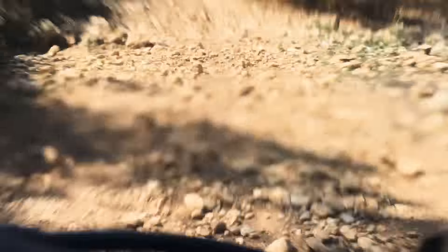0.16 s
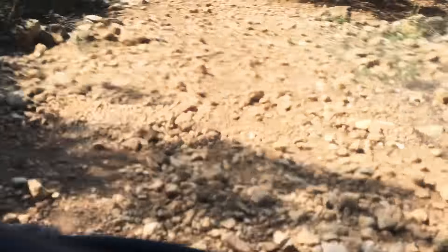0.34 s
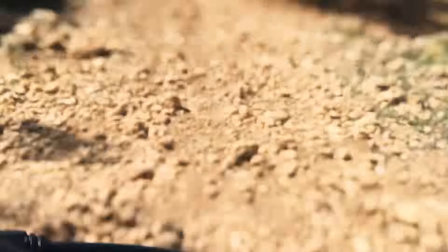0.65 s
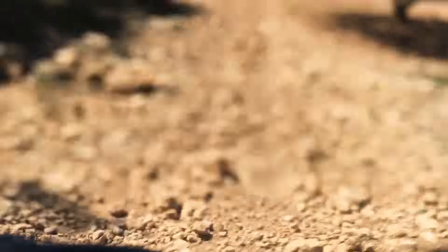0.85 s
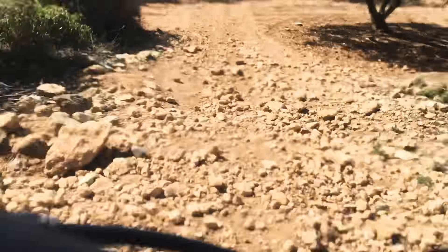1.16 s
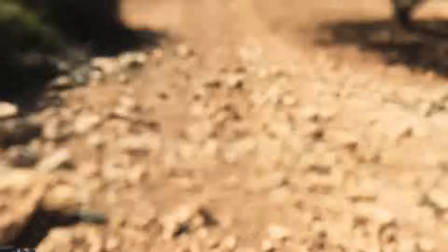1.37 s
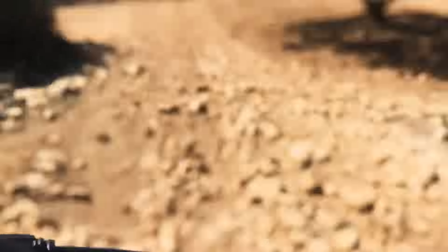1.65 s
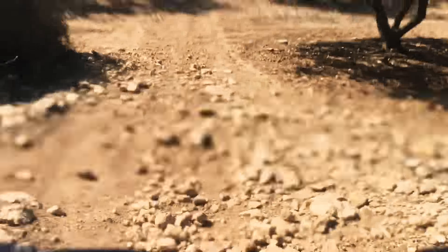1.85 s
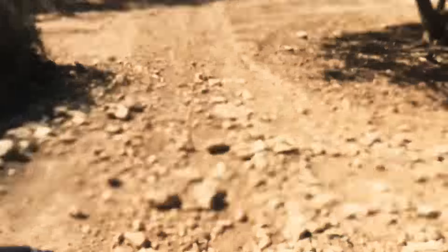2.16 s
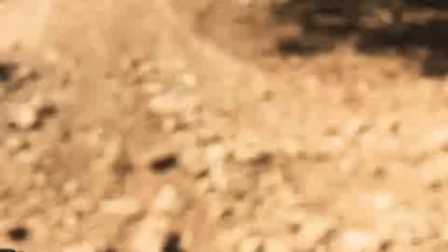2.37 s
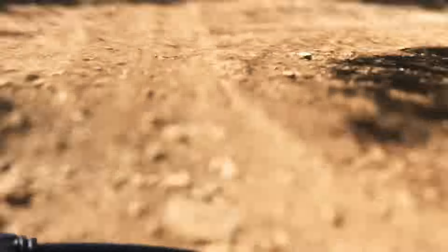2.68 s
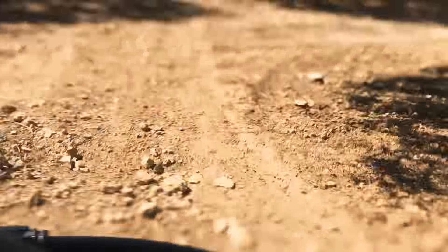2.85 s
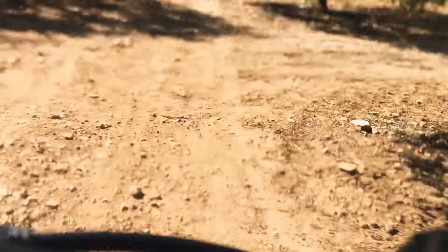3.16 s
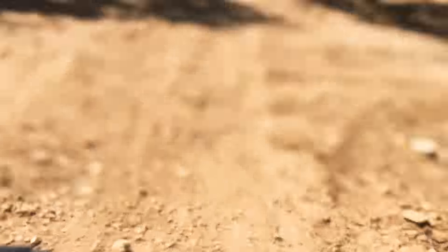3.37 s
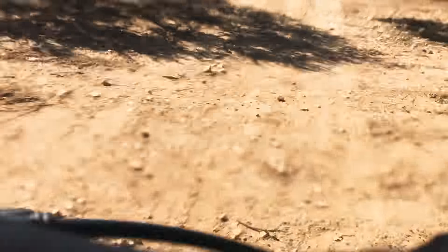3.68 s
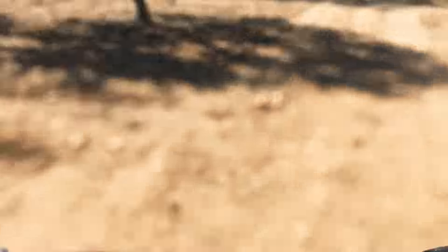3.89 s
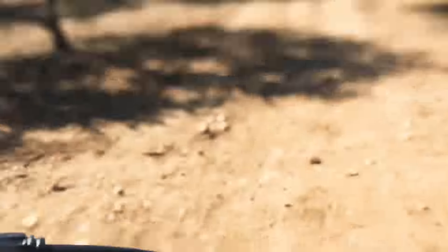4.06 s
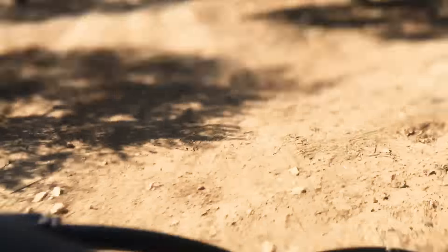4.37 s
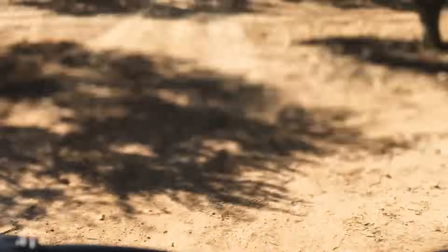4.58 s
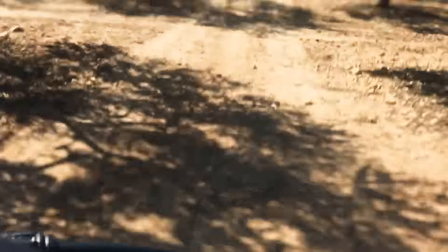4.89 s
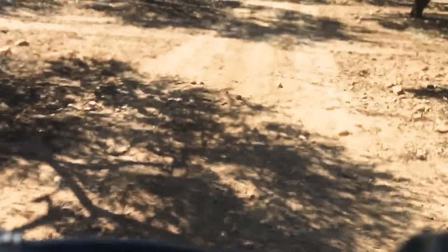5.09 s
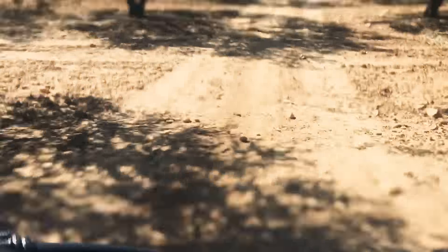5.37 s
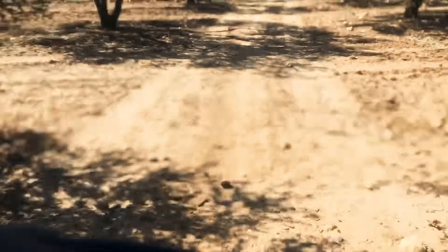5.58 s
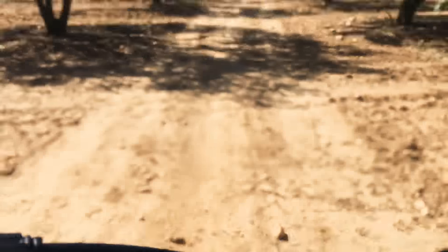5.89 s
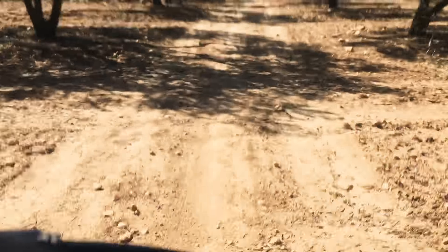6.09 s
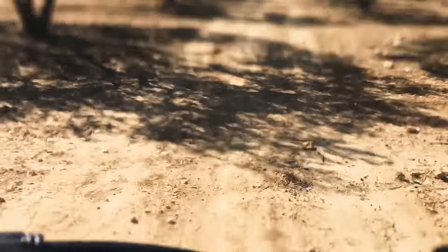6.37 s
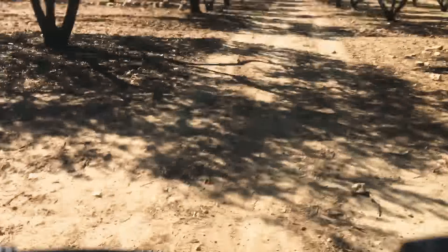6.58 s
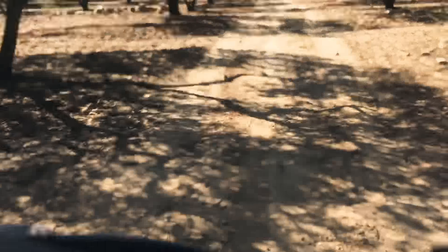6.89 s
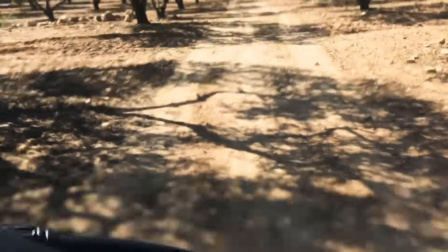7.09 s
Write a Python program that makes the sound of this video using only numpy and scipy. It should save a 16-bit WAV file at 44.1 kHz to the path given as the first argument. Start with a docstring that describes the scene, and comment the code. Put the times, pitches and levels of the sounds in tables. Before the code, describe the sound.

A mountain bike freewheels down a stony track, tyres crunching gravel, stones knocking rim and frame, hub ticking, wind rumbling, then easing onto packed dirt.

```python
"""On a stony track that smooths out into packed dirt, a mountain bike freewheels downhill.
The tyres crush gravel and flick grit: many tiny ringing pebbles over noise, plus short loud snaps.
Stones knock on rim and frame and the freehub ratchet ticks: short blows that set metal ringing.
Filtered noise hisses as passing air; wind and jolts make a lumpy rumble in one housed microphone."""
import sys
import numpy as np
from scipy import signal
from scipy.fft import rfft, irfft, next_fast_len
from scipy.io import wavfile

SR = 44100
rng = np.random.default_rng(int(sys.argv[2]) if len(sys.argv) > 2 else 0)


def master(y):
    """Save y as 16-bit WAV."""
    cut = np.clip(np.atleast_2d(y).T, -1, 1)
    pcm = np.round(cut * 32767)  # scale
    wavfile.write(sys.argv[1], SR, pcm.astype(np.int16))


N = 319284

# buffets and jolts pushing at the microphone: (t/s, peak level/dB, f/Hz)
BUFFET_EVENTS = [(0.068, -12, 92.5), (0.123, -14, 48), (0.16, -10.5, 91), (0.224, -26, 95),
                 (0.335, -19, 64), (0.464, -16.5, 95), (0.731, -21.5, 64), (0.868, -24, 65),
                 (0.958, -14.5, 98), (1.02, -14, 89), (1.151, -11, 159), (1.437, -14, 75),
                 (1.694, -16, 108), (1.815, -20, 76), (2.028, -32, 77), (2.059, -13.5, 65.4),
                 (2.157, -21, 69), (2.226, -13.5, 71), (2.403, -16.5, 71.5), (2.691, -25, 70),
                 (2.732, -18.5, 81.5), (2.768, -17, 81), (2.866, -15.5, 63.5), (2.896, -21, 53),
                 (3.064, -12, 57.6), (3.156, -23, 88.5), (3.353, -17.5, 70.6), (3.474, -20.5, 75),
                 (4.09, -20, 74.6), (4.349, -27.5, 71), (4.556, -23.5, 74.5), (4.845, -13.5, 58.5),
                 (4.985, -17.5, 65), (5.367, -20, 59), (5.574, -21, 80), (5.847, -18, 65.5),
                 (5.967, -26, 77.4), (6.214, -19, 81.5), (6.256, -18.5, 69.6), (6.335, -15.5, 70.4),
                 (6.462, -17.5, 89), (6.604, -20, 64.5), (6.656, -21, 59), (6.722, -12.5, 215),
                 (7.151, -19.5, 96)]


def from_db(db):
    """Turns decibels into a gain."""
    return 10 ** (np.asarray(db) / 20)


def rms_one(x):
    """Scales a sound to an average (rms) strength of 1."""
    return x / np.sqrt(np.mean(x ** 2) + 1e-20)


def with_power(level_db, extra):
    """Adds more power to a level in dB."""
    return 10 * np.log10(from_db(2 * level_db) + extra)


def in_time(rows):
    """Draws straight lines between the rows of a table, giving each column a value per sample."""
    s, *columns = np.transpose(rows)
    return [np.interp(np.arange(N) / SR, s, column) for column in columns]


def drift(rate_hz):
    """Wanders slowly at random with rms 1: noise smoothed twice by a low-pass."""
    step = 16  # samples between the points worked out
    r = np.exp(-2 * np.pi * rate_hz * step / SR)
    noise = rng.standard_normal(N // step + 4002)
    slow = signal.lfilter([1], [1, -2 * r, r * r], noise)[4000:]  # skips the filter's start
    # The points span the whole sound; straight lines fill the samples between them.
    return np.interp(np.arange(N) / step, np.arange(len(slow)), rms_one(slow))


def ring(clicks, hz, t60):
    """Lets each click start a sine that fades by 60 dB in t60 seconds."""
    r = from_db(-60 / (t60 * SR))
    w = 2 * np.pi * hz / SR
    return signal.lfilter([0, np.sin(w)], [1, -2 * r * np.cos(w), r * r], clicks + 1e-18)


def colour(x, spectrum):
    """Filters to a given tone colour with minimum phase, so that nothing sounds early."""
    size = next_fast_len(N + SR // 4)
    hz, level_db = np.transpose(spectrum)
    bins_hz = np.arange(size // 2 + 1) * SR / size
    log_gain = np.interp(np.log(bins_hz + 1), np.log(hz), level_db) * np.log(10) / 20
    # Folding the cepstrum onto its first half makes the filter minimum phase.
    cepstrum = irfft(log_gain, size)
    cepstrum[1:size // 2] *= 2
    cepstrum[size // 2:] = 0
    return irfft(rfft(x, size) * np.exp(rfft(cepstrum)), size)[:N]


def grains(per_s, spread_db, crowding):
    """Scatters random clicks of very uneven size, denser where the crowding is high."""
    size_db = spread_db * np.minimum(rng.exponential(1, N), 4)
    sizes = from_db(size_db) * rng.choice([-1, 1], N)
    return sizes * (rng.random(N) < per_s * crowding / SR)


def pebbles(clicks, low_hz, high_hz, cycles):
    """Deals clicks to stones of 16 sizes; each rings a few cycles, the smaller, higher ones more strongly."""
    pitches = np.geomspace(low_hz, high_hz, 16)
    dealt = rng.integers(0, 16, N)
    return sum(ring(clicks * (dealt == k), hz, cycles / hz) * hz for k, hz in enumerate(pitches))


def scatter(hits, seconds):
    """Makes noise that follows each hit and dies away: chips and sand thrown loose."""
    power = signal.lfilter([1], [1, -np.exp(-1 / (seconds * SR))], hits ** 2)
    return np.sqrt(power) * rng.standard_normal(N)


def add(out, s, burst):
    """Mixes a burst in at a moment."""
    i = max(round(s * SR), 0)
    out[i:i + len(burst)] += burst[:N - i]


def strikes(rows, cycles, rise, rough):
    """Rings each row a few cycles at its pitch, with a second, unrelated tone and a rough edge."""
    out, t = np.zeros(N), np.arange(2400) / SR
    chance = rng.random((len(rows), 3))
    noise = rng.standard_normal((len(rows), len(t)))
    for (s, peak_db, hz), (phase, ratio, length), grain in zip(rows, chance, noise):
        decay = cycles * (0.58 + .5 * length) / hz  # seconds
        shape = (1 - np.exp(-t / (rise * decay))) * np.exp(-t / decay)
        second_hz = hz * 2 ** (1.775 * ratio - .8)
        tone = np.sin(2 * np.pi * (hz * t + phase)) + 0.65 * np.sin(2 * np.pi * second_hz * t)
        burst = shape * (tone + rough * grain)
        add(out, s, from_db(peak_db) * burst / np.abs(burst).max())
    return out


def strays(level_db, above_db, low_hz, high_hz, count):
    """Draws small strikes (t/s, peak/dB, f/Hz) at random, stronger where the ground is louder."""
    when, size, pitch = rng.random((count, 3)).T
    at = (when * (N - 1)).astype(int)
    peak_db = level_db[at] + above_db - 8 * size
    return np.transpose([at / SR, peak_db, low_hz * (high_hz / low_hz) ** pitch])


def air():
    """Makes a soft hiss of air passing rider and spokes: broad noise that gently swells and fades."""
    band = signal.butter(1, [2200, 13900], "band", fs=SR, output="sos")
    hiss = rms_one(signal.sosfilt(band, rng.standard_normal(N)))
    return from_db(-58.5 + 4.5 * drift(3.6)) * hiss


def rumble(level_db, flutter_db):
    """Eddies break on the microphone port as separate pushes; a quicker flutter adds to them."""
    # colour of the rumble: (f/Hz, level/dB)
    rumble_colour = [(13, -29), (22, -15), (54, 0), (86, 0), (144, -9.5), (231, -18.5), (321, -31.5),
                     (385, -34), (500, -48), (650, -92), (1100, -120)]
    eddies = rms_one(grains(150, 3.75, from_db(2.2 * drift(11.0))))
    low = rms_one(colour(eddies + 0.85 * rng.standard_normal(N), rumble_colour))
    slow = signal.sosfiltfilt(signal.butter(2, 130, fs=SR, output="sos"), low)
    quick = low - slow
    return from_db(level_db) * rms_one(low + from_db(flutter_db) * quick)


def wind():
    """Rumbles on the microphone with a changing level, swelling in power round each buffet."""
    # wind through the ride: (t/s, rumble level/dB, gain of added flutter above 130 Hz/dB)
    wind_levels = [(0.0, -33, 4.5), (0.48, -33.5, 0), (0.81, -32.5, -4), (1.15, -24.5, 0.5),
                   (1.71, -29, -3), (2.42, -26, -6), (3.15, -41.5, 4), (3.25, -34, 5), (3.95, -29.5, -18),
                   (4.36, -36.5, 2), (5.46, -33.5, -9.5), (5.89, -27, -25), (6.51, -28.5, -10),
                   (6.81, -33.5, -3), (7.06, -31.5, -12), (7.24, -31, -28)]
    gust_db, gust_s = -11, 0.033  # swell against the buffet's peak, and its half-width
    level_db, flutter_db = in_time(wind_levels)
    t = np.arange(N) / SR
    gusts = sum(from_db(2 * (peak_db + gust_db)) * np.exp(-((t - s) / gust_s) ** 2)
                for s, peak_db, _ in BUFFET_EVENTS)
    return rumble(with_power(level_db, gusts), flutter_db)


def buffets():
    """Each strong eddy or jolt pushes the microphone's diaphragm to and fro a couple of times."""
    out, t = np.zeros(N), np.arange(-2200, 2200) / SR
    for (s, peak_db, hz), phase in zip(BUFFET_EVENTS, rng.random(len(BUFFET_EVENTS))):
        swing = np.exp(-(t * hz / 0.64) ** 2) * np.cos(2 * np.pi * (hz * t + phase))
        add(out, s + t[0], from_db(peak_db) * swing)
    return out


def freehub():
    """At every tooth the pawls drop one after another and chatter, ringing the hub shell."""
    # turning of the ratchet: (t/s, teeth passed so far)
    tooth_count = [(0, 0.0), (4.0, 146.12), (4.2, 153.25), (4.4, 160.55), (4.6, 168.29), (4.8, 175.63),
                   (5.0, 182.49), (5.2, 189.03), (5.4, 196.62), (5.6, 204.26), (5.8, 211.44), (6.0, 219.27),
                   (6.2, 226.62), (6.4, 233.93), (6.6, 241.26), (6.8, 248.39), (7.0, 255.57),
                   (7.24, 264.68)]
    # ringing tones of the hub shell: (f/Hz, level/dB, time to fade by 60 dB/s)
    hub_modes = [(6140, -6.5, 0.022), (7000, -3, 0.0069), (7600, -29, 0.0027), (8170, -6, 0.013),
                 (9300, -23, 0.006), (9300, -3.5, 0.0067), (12000, -13, 0.0044), (12900, -13, 0.012),
                 (13700, -3, .005), (14800, 1, .005), (15400, -7, 0.006)]
    lag_teeth, spread_teeth = -0.085, .1  # shift of every tick; average lateness of its contacts
    s, teeth = np.transpose(tooth_count)
    whole = np.arange(1, teeth[-1])[:, None]
    late = spread_teeth * rng.gamma(2, .5, (len(whole), 24))  # 24 small contacts a tooth
    moments = np.interp(whole + lag_teeth + late, teeth, s)
    at = np.minimum(moments * SR, N - 1).astype(int)
    force = from_db(-52 + 2.0 * rng.standard_normal(whole.shape))
    out = np.zeros(N)
    for hz, level_db, t60 in hub_modes:
        strength = force * from_db(level_db + 1.9 * rng.standard_normal(whole.shape))
        clicks = np.zeros(N)
        clicks[at] = strength * rng.standard_normal(at.shape)
        out += ring(clicks, hz, t60)
    return out


def pings():
    """Parts of the bike ring on after a stone strike, each as one fading sine."""
    # parts that ring: (t/s, peak level/dB, f/Hz, time to fade by 60 dB/s)
    ringing_parts = [(3.366, -25.5, 3450, 0.036), (3.455, -20, 14400, .015), (3.461, -19.5, 13540, 0.029),
                     (3.462, -26, 3480, 0.045), (4.593, -38, 648, 0.39), (4.593, -25.5, 800, 0.084),
                     (5.209, -32, 2360, 0.078)]
    t, out = np.arange(SR // 10) / SR, np.zeros(N)
    for s, peak_db, hz, t60 in ringing_parts:
        add(out, s, from_db(peak_db - 60 * t / t60) * np.sin(2 * np.pi * hz * t))
    return out


def frame(clicks):
    """Blows ring in the tubes and rims, each ringing tone struck with its own strength."""
    # ringing tones of tubes and rims: (f/Hz, level/dB, time to fade by 60 dB/s)
    frame_modes = [(550, -6, 0.013), (800, -4.5, 0.057), (1140, 3.5, 0.052), (1470, -0.5, 0.11),
                   (1857, 9, 0.029), (2150, 11, 0.031), (2386, 3.5, 0.042)]
    out = np.zeros(N)
    for hz, level_db, t60 in frame_modes:
        strength = from_db(level_db + 3 * rng.standard_normal(N))
        out += ring(clicks * strength, hz, t60)
    return out


def knocks(crunch_db):
    """Stones knock briefly; hard, high knocks also splinter and set the frame ringing."""
    # loudest stones on tyre (low), rim and frame: (t/s, peak level/dB, f/Hz)
    loud_knocks = [(.063, -23, 210), (.065, -16.5, 616), (.089, -23, 1100), (.22, -19.5, 215),
                   (.221, -24, 2150), (.325, -20, 675), (.356, -10, 1530), (.419, -11.5, 2220),
                   (.452, -16.5, 201.5), (.452, -16.5, 744), (.459, -16, 940), (.466, -11.5, 2310),
                   (.54, -18.5, 2250), (.549, -22, 1310), (.606, -17.5, 1360), (.616, -20, 1350),
                   (.649, -7.5, 990), (.707, -19, 1590), (.739, -12.5, 1190), (.752, -19, 1160),
                   (.81, -14, 2150), (.856, -14.5, 1070), (.858, -21, 219), (.87, -13.5, 1140),
                   (.934, -21.5, 2040), (.946, -22.5, 227), (.947, -7.5, 860), (1.094, -17, 2450),
                   (1.161, -20.5, 243), (1.204, -15.5, 400), (1.207, -20, 545), (1.242, -14.5, 720),
                   (1.292, -15, 1120), (1.3, -10.5, 1530), (1.309, -4, 1390), (1.317, -22, 1650),
                   (1.529, -18, 1640), (1.692, -21.5, 1090), (1.749, -17, 900), (1.806, -12.5, 800),
                   (1.93, -22, 1860), (2.031, -19, 216), (2.039, -13.5, 2340), (2.156, -22, 875),
                   (2.226, -18, 1470), (2.252, -11.5, 1610), (2.273, -10.5, 1670), (2.284, -10.5, 930),
                   (2.328, -15, 1900), (2.341, -18, 732), (2.408, -14, 606), (2.419, -12.5, 860),
                   (2.535, -18, 2330), (2.544, -13.5, 756), (2.674, -17.5, 1240), (2.693, -21.5, 228),
                   (2.697, -25, 1110), (2.775, -23, 1280), (2.815, -18, 1100), (2.845, -18.5, 1070),
                   (2.902, -17.5, 1140), (3.077, -23.5, 620), (3.131, -17.5, 1970), (3.163, -24, 239),
                   (3.351, -23.5, 890), (3.449, -18, 213), (3.449, -7, 2050), (3.451, -14, 575),
                   (3.459, -21, 1040), (3.479, -11.5, 2260), (3.545, -23, 2220), (3.555, -17, 2200),
                   (3.644, -24.5, 1930), (3.773, -19, 1190), (3.795, -17, 1850), (3.855, -17.5, 1120),
                   (3.949, -18.5, 1550), (3.957, -20, 1190), (3.99, -21.5, 614), (4.069, -16, 2150),
                   (4.077, -13.5, 1110), (4.292, -25.5, 1750), (4.354, -25.5, 2950), (4.423, -21, 1510),
                   (4.561, -23.5, 1560), (4.589, -24.5, 314), (4.591, -16, 850), (4.846, -34, 483),
                   (4.978, -29, 2050), (5.097, -26, 1300), (5.175, -28, 342), (5.287, -24, 1190),
                   (5.325, -18, 1390), (5.332, -12, 2210), (5.412, -26.5, 2240), (5.503, -23.5, 1470),
                   (5.518, -26, 1700), (5.545, -23.5, 1900), (5.572, -25.5, 1180), (5.841, -28, 214),
                   (5.912, -28, 2150), (6.009, -39, 587), (6.315, -28, 330), (6.72, -18.5, 448),
                   (7.119, -36, 2000), (7.135, -22.5, 2050), (7.223, -23.5, 1500)]
    small_knocks = strays(crunch_db, 8.5, 660, 2500, count=40)
    rows = np.vstack([loud_knocks, small_knocks])
    clicks = np.zeros(N)
    for s, peak_db, hz in rows:
        hardness = min(hz / 1000, 1) ** 2  # a soft, low blow barely rings the tubes
        add(clicks, s, from_db([peak_db - 24.5]) * hardness)
    stones = strikes(rows, cycles=1.9, rise=.6, rough=0)
    hard = signal.sosfilt(signal.butter(2, 700, "high", fs=SR, output="sos"), stones)
    chip_band = signal.butter(2, [1300, 4200], "band", fs=SR, output="sos")
    chips = signal.sosfilt(chip_band, scatter(hard, seconds=0.0015))
    return stones + from_db(-19.0) * chips + frame(clicks)


def ground():
    """Sets the track's levels, lifted over loose stone: quick rise, hold, slower fall."""
    # track under the tyres: (t/s, crunch level/dB, big stones' level below 900 Hz/dB, grit level/dB)
    track_levels = [(0.0, -44.5, 5, -35), (0.1, -42.5, -4, -43), (0.54, -39.5, -0.5, -39.5),
                    (1.05, -42, 0, -40.5), (1.29, -42, 3.5, -44.5), (1.57, -43.5, 1.5, -43),
                    (2.1, -40.5, -2.5, -38.5), (2.36, -43, -0.5, -41), (2.88, -42.5, -2, -42.5),
                    (3.27, -45, -1.5, -44), (3.93, -43, -5.5, -42), (4.19, -44.5, -4.5, -47),
                    (4.58, -46.5, -3.5, -56), (4.94, -48.5, -3, -54), (5.44, -48, -5.5, -49),
                    (5.68, -48, -3.5, -49.5), (6.92, -53.5, 0, -64), (7.24, -45.5, -7.5, -48)]
    # patches of loose stone: (start t/s, length/s, crunch level/dB, grit level/dB)
    loose_patches = [(0.061, 0.081, -35.5, -41), (0.284, 0.091, -32, -36.5), (0.418, 0.054, -37, -38),
                     (0.58, .06, -34, -44), (0.679, 0.089, -35.5, -35.5), (0.793, 0.15, -40, -39),
                     (1.031, 0.097, -36, -40.5), (1.203, .07, -40.5, -33), (1.283, 0.057, -32, -35),
                     (1.362, 0.069, -40, -30.5), (1.518, 0.022, -56, -44), (1.733, 0.088, -38, -41.5),
                     (1.893, 0.073, -42.5, -41), (2.164, 0.033, -36.5, -39.5), (2.22, 0.16, -34.5, -32.5),
                     (2.399, 0.043, -30.5, -31.5), (2.464, .12, -34.5, -35), (2.67, 0.047, -33.5, -30.5),
                     (2.749, 0.19, -35, -34.5), (3.093, 0.093, -39, -37.5), (3.423, 0.052, -43.5, -32),
                     (3.523, 0.037, -37, -36), (3.75, 0.12, -37.5, -42), (3.924, 0.15, -37.5, -36),
                     (4.046, 0.11, -39.5, -39.5), (4.427, 0.032, -49, -43), (4.823, 0.06, -41.5, -49),
                     (4.888, 0.047, -50.5, -39), (5.17, 0.054, -47, -46), (5.269, 0.081, -37, -36.5),
                     (5.481, 0.09, -41.5, -47), (7.105, 0.029, -41.5, -41.5)]
    rise_s, fall_s = 0.0062, 0.028
    crunch_db, coarse_db, grit_db = in_time(track_levels)
    t, loose = np.arange(N) / SR, np.zeros((2, N))
    for s, length, *level_db in loose_patches:
        inside = np.interp(t, [s - rise_s, s, s + length, s + length + fall_s], [0, 1, 1, 0])
        loose += from_db(2 * np.array(level_db))[:, None] * inside ** 2
    return with_power(crunch_db, loose[0]), coarse_db, with_power(grit_db, loose[1])


def snaps(grit_db):
    """Grit snaps under the tread in very short, bright bursts; nothing low comes of it."""
    # loudest snaps: (t/s, peak level before the high-pass/dB, f/Hz)
    loud_snaps = [(0.034, -16, 5960), (0.108, -13, 6000), (0.1433, -12, 9740), (0.1674, -13, 7230),
                  (0.1732, -13, 6420), (0.2709, -12, 7100), (0.277, -11.5, 6900), (0.3496, -19, 7050),
                  (0.391, -17, 7620), (0.4256, -11, 9290), (0.4714, -11.5, 7250), (0.5332, -13, 9390),
                  (0.6476, -15, 6270), (0.6833, -13, 8550), (0.743, -8, 8170), (0.802, -15, 6000),
                  (0.918, -12.5, 9300), (0.9845, -12.5, 8200), (1.0076, -18, 7100), (1.0182, -15, 6060),
                  (1.1034, -19.5, 6000), (1.221, -17, 8930), (1.2274, -16, 8050), (1.266, -12, 6070),
                  (1.297, -6.5, 5900), (1.3563, -14.5, 8750), (1.3624, -17, 8120), (1.4277, -20, 6510),
                  (1.493, -19, 6220), (1.517, -15, 6550), (1.5453, -15, 6140), (1.6147, -16, 9500),
                  (1.6515, -13, 9400), (1.703, -19, 6360), (1.7124, -14, 6400), (1.722, -8.5, 5800),
                  (1.7304, -10, 9470), (1.757, -12, 9480), (1.7793, -12, 9310), (1.7883, -12, 8070),
                  (1.7967, -7, 6250), (1.8503, -13.5, 11000), (1.9135, -16.5, 6490), (1.9257, -18, 9160),
                  (1.9736, -16, 9390), (2.1136, -14.5, 10000), (2.229, -12, 9130), (2.298, -8, 10900),
                  (2.327, -14, 7000), (2.4157, -11, 6080), (2.4281, -5, 6240), (2.4796, -14, 9200),
                  (2.4854, -14, 7890), (2.5298, -11, 9600), (2.5775, -15, 9450), (2.6876, -13, 8970),
                  (2.818, -10, 8900), (2.927, -15.5, 6100), (3.0033, -15.5, 6050), (3.0254, -16, 9200),
                  (3.1063, -12, 8650), (3.1297, -11.5, 5940), (3.2822, -21, 6200), (3.3973, -11, 9200),
                  (3.4196, -17, 9310), (3.5152, -17.5, 9000), (3.556, -16, 6170), (3.6632, -12, 9150),
                  (3.7428, -12, 9530), (3.8093, -12.5, 9200), (3.8484, -15, 9000), (3.8954, -15.5, 6050),
                  (3.9389, -10.5, 7000), (3.9736, -5, 7570), (4.052, -18, 6060), (4.059, -17, 6600),
                  (4.2205, -21, 9000), (4.349, -24, 6620), (4.3874, -14.5, 9200), (4.4333, -17, 6270),
                  (4.4414, -26, 6140), (4.8885, -18, 9080), (4.8973, -10, 9300), (4.9057, -18, 7170),
                  (4.9287, -25, 6350), (5.086, -20.5, 6970), (5.1692, -17, 9000), (5.1754, -22, 6500),
                  (5.2046, -28, 7010), (5.3037, -11, 8150), (5.437, -21, 7960), (5.5448, -26, 7430),
                  (5.663, -24, 6660), (5.8152, -26, 7200), (5.8353, -19.5, 5730), (5.901, -29, 9620),
                  (5.913, -19, 6300), (5.9507, -19, 6260), (5.9592, -24, 6100), (6.0906, -28, 8940),
                  (6.145, -14, 10700), (6.3294, -25, 6050), (6.4585, -22, 6700), (6.4938, -15.5, 9200),
                  (6.5784, -25, 6200), (6.6029, -21, 6400), (6.687, -20, 6900), (6.8438, -24.5, 5960),
                  (7.1222, -22, 5850), (7.131, -13.5, 6120), (7.203, -23, 6540)]
    small_snaps = strays(grit_db, 19.5, 4000, 14000, count=60)
    cracks = strikes(np.vstack([loud_snaps, small_snaps]), cycles=3.0, rise=0.11, rough=0.39)
    cracks = cracks + from_db(-21.5) * scatter(cracks, seconds=0.0006)
    return signal.sosfilt(signal.butter(2, 3200, "high", fs=SR, output="sos"), cracks)


def grit(level_db, crowding):
    """Sand hisses as noise, with the fine crackle of tiny ringing grains on top."""
    # colour of the grit: (f/Hz, level/dB)
    grit_colour = [(1530, -26), (2600, 3.5), (4800, 7.5), (5300, 9), (9150, 5), (10300, 3.5), (11500, 0.5),
                   (13800, 1.5), (15900, 8.5)]
    crackle = rms_one(pebbles(grains(700, 4.4, crowding), 2330, 12240, cycles=6.6))
    hiss = (0.32 + 0.33 * crowding ** 1.2) * rng.standard_normal(N)
    return from_db(level_db) * rms_one(colour(crackle + hiss, grit_colour))


def crunch(level_db, coarse_db, crowding):
    """Gravel is crushed under the tread: ringing pebbles on a rolling roar, partly through the frame."""
    # colour of the crunch: (f/Hz, level/dB)
    crunch_colour = [(190, -6), (330, -5.5), (459, -7), (660, -2), (748, -9.5), (1130, 2), (1510, -0.5),
                     (1920, 5), (2710, -6.5), (3320, -1.5), (5000, -16.5), (6500, -45), (11000, -120)]
    crush = rms_one(pebbles(grains(900, 3.2, crowding), 350, 4800, cycles=16.0))
    roar = .7 * crowding ** .15 * rng.standard_normal(N)
    rattle = rms_one(frame(grains(180, 4.2, crowding)))
    gravel = rms_one(colour(crush + roar, crunch_colour)) + 0.45 * rattle
    # The big stones below 900 Hz get a level of their own.
    big = signal.sosfiltfilt(signal.butter(2, 900, fs=SR, output="sos"), gravel)
    small = rms_one(gravel - big)
    return from_db(level_db) * (small + from_db(coarse_db) * rms_one(big))


def scene():
    """Adds all sources in mono; the same patches of loose stone drive crunch and grit."""
    crunch_db, coarse_db, grit_db = ground()
    crowding = from_db(5.0 * drift(25))
    grit_crowding = crowding * from_db(4.3 * drift(45))
    tyres = crunch(crunch_db, coarse_db, crowding) + grit(grit_db, grit_crowding) + snaps(grit_db)
    bike = knocks(crunch_db) + pings() + freehub()
    return (air() + wind() + buffets() + bike + tyres)[None]


def record(dry):
    """Gives the housed microphone's colour, rounds the peaks, then cuts the top steeply."""
    # response of the housed microphone: (f/Hz, level/dB)
    microphone_colour = [(20, -6.5), (40, 1.5), (9000, -2.5), (10400, -3.5), (11500, 2), (14000, -2.5),
                         (16000, -8.5)]
    heard = .8 * np.tanh(colour(dry[0], microphone_colour) / .8)
    top_cut = signal.ellip(10, .5, 60, 15950, fs=SR, output="sos")  # cutoff in Hz
    return signal.sosfilt(top_cut, heard)[None]


dry = scene()
out = record(dry)
master(out)
```